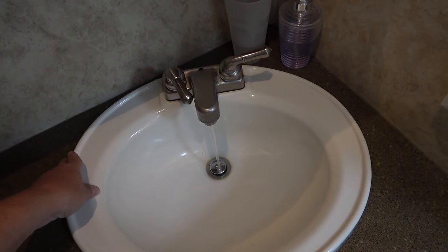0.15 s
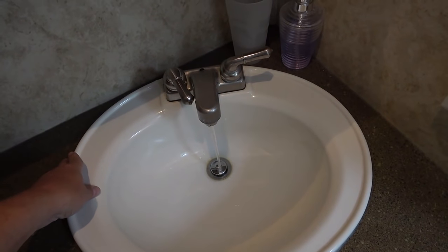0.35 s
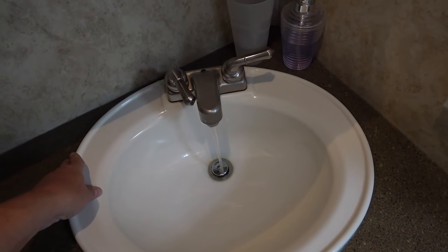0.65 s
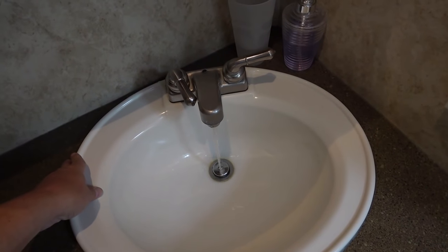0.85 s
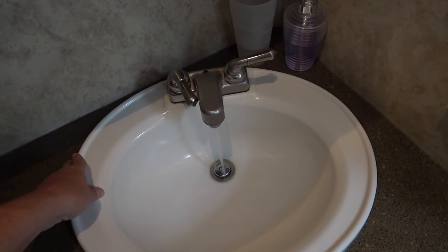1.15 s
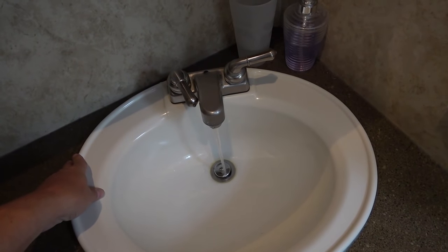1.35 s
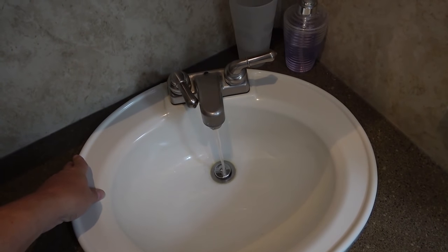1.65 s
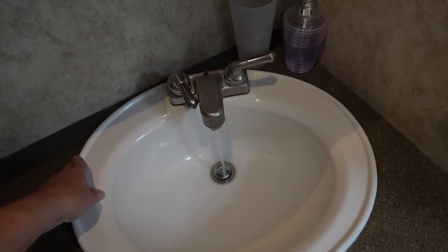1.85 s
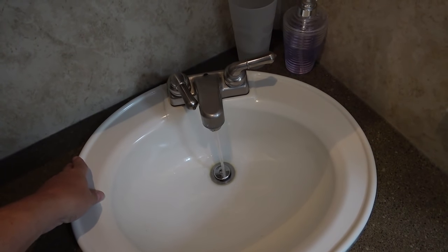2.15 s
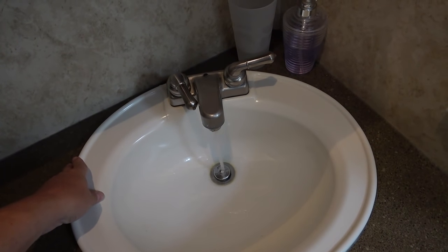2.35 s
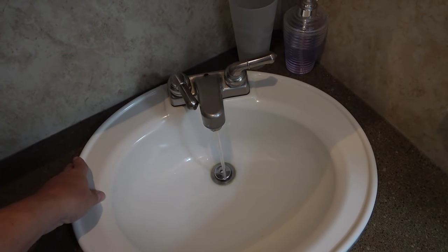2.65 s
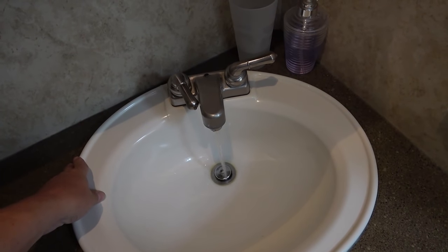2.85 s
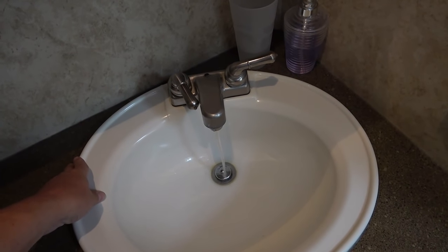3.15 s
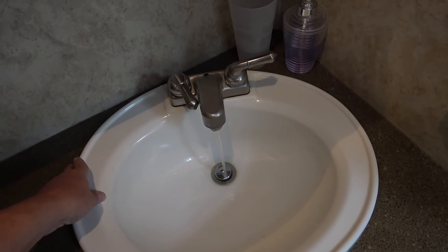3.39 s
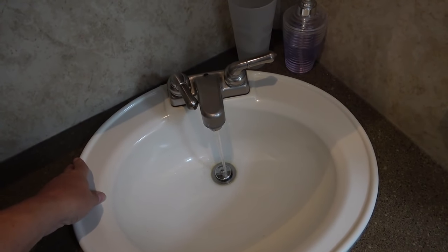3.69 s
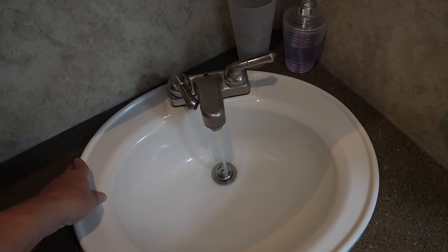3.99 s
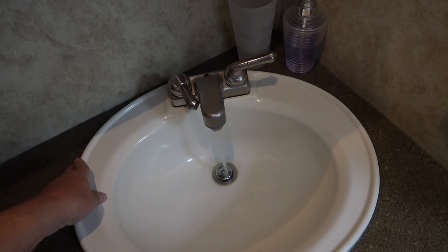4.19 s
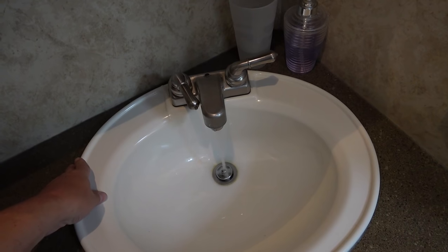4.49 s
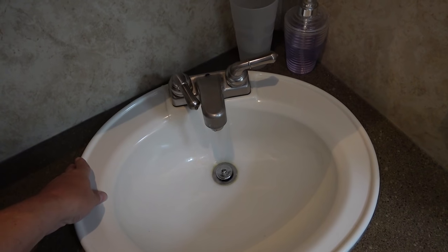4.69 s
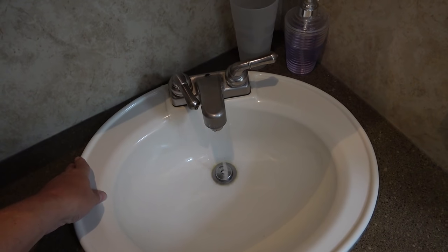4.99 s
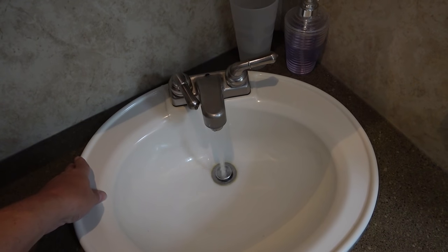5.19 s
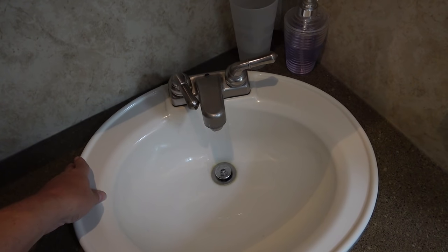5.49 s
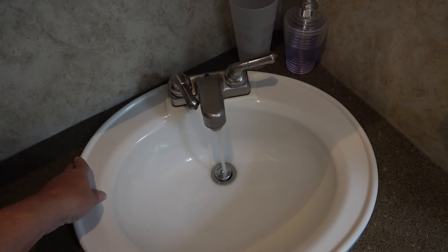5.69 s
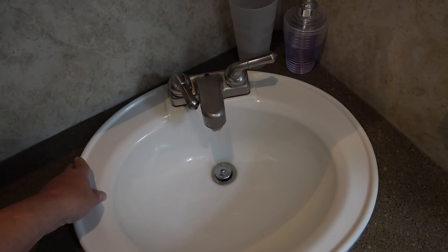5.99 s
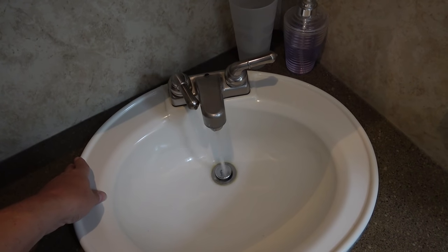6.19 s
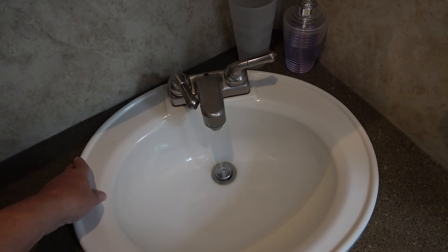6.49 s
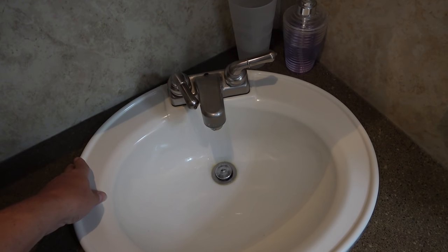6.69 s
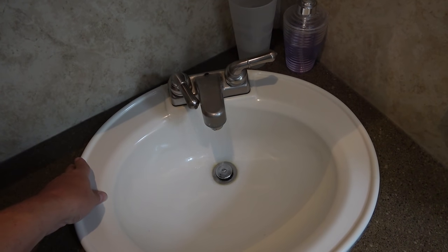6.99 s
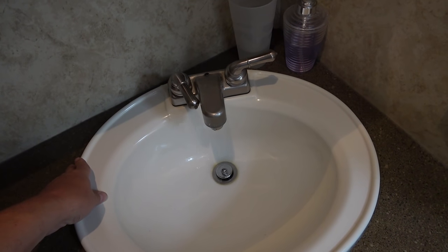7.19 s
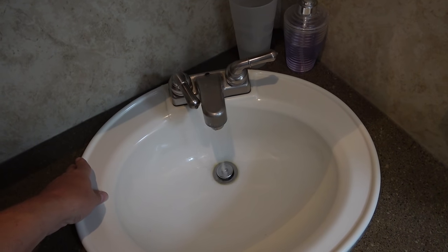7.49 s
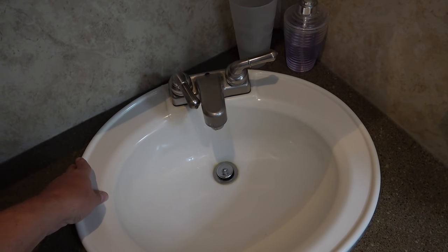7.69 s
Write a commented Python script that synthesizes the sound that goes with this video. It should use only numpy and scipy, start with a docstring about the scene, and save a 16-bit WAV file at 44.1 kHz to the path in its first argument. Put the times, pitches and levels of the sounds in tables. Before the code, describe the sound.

In a small camper bathroom, compressed air pushes water out of a tap. It first spits in quick clusters of small wet pops, with drops ticking on the basin. About halfway through it breaks into louder hollow gurgles and the drain glugs. Then air and water rush out in a hissing, slightly whistling spray, with a faint compressor hum underneath. The sound is close, with short room echoes.

```python
"""Blowing out a camper tap

Compressed air clears a bathroom tap in a small camper. Slugs of water pop and gurgle out of the spout,
trapped air sings in it, drops tick on the enamel basin and the drain glugs. Then air rushes out with
a hissing, whistling spray while the compressor motor hums. Gurgle and spray are shaped noise;
drops and pops are short, fading tones."""
import sys
import numpy as np
from scipy import signal
from scipy.fft import rfft, irfft, next_fast_len
from scipy.io import wavfile

SR = 44100
rng = np.random.default_rng(int(sys.argv[2]) if len(sys.argv) > 2 else 0)


def unload_wav(signal):
    """Save mono or channel-first audio to the path in sys.argv[1] as 16-bit WAV at rate SR, clipped to [-1, 1]."""
    wavfile.write(
        sys.argv[1],
        SR,
        np.round(np.clip(np.atleast_2d(signal).T, -1, 1) * 32767).astype(np.int16),
    )


N = 346185

# Stereo width of the room. Each row: frequency in Hz, gain in dB of the left-minus-right sound.
WIDTH_SPECTRUM = [(120, -14), (550, -8.5), (4970, -4), (15000, -3)]
# Stereo balance. Each row: time in seconds, left minus right in dB.
BALANCE = [(0, 0.5), (4.5, 0.1), (6, -1.64)]
# The compressor's hum. Each row: pitch in Hz, level in dB.
MOTOR_TONES = [(490.5, -34.5), (576, -38.5), (759, -34.5)]
# Tone colours of three noises. Each row: frequency in Hz, relative level in dB.
DRAIN_SPECTRUM = [(60, -46), (90, -9), (150, -17), (200, 2.5), (420, -3), (650, -7.5), (900, 6)]
SPRAY_SPECTRUM = [(530, -53), (1000, -24), (1800, 0.5), (2700, 1), (5160, 4), (10600, -1.5), (16000, -18.5)]
GURGLE_SPECTRUM = [(320, -57), (550, -36), (863, -4.5), (1000, -5.5), (1960, -4.5), (2560, -19.5),
                   (6000, -19)]
# The air column above the drain trap. Each row: pitch in Hz, width in Hz, gain in dB.
TRAP_RESONANCE = [(315.2, 17.3, 3)]
# Glugs in the trap. Each row: start in seconds, length in seconds, level in dB.
TRAP_GLUGS = [(.46, 0.21, -47.5), (2.66, 0.095, -51), (4.3, 0.041, -33), (5.055, 0.027, -28.5),
              (6.04, 0.33, -38.5), (6.44, 0.055, -32.5), (7.26, 0.043, -31)]
# Big bubbles swallowed by the trap. Each row: start in seconds, level in dB, pitch in Hz.
TRAP_GULPS = [(5.049, -2, 272), (5.115, -8.5, 286)]
# Foam bursting by the drain. Each row: start in seconds, end in seconds.
FOAM_TIMES = [(.03, .4)]
# Drops on the basin. Each row: start in seconds, level in dB, pitch in Hz.
BASIN_DROPS = [(0.0574, -17, 4870), (1.01, -13, 7240), (1.028, -4.5, 3400), (1.051, -11.5, 5000),
               (2.0273, -12.5, 5170), (2.546, 2.5, 3900), (3.106, -13, 8800), (3.153, -9, 9250),
               (3.179, -10, 11000), (3.3036, -11.5, 8240), (3.776, -11.5, 8500), (3.885, -16.5, 5130),
               (3.907, -15.5, 8250), (4.5113, -3.5, 3830), (4.589, -6, 4800)]
# Air pockets in the spout. Each row: start and end in seconds, first and last pitch in Hz, level in dB.
AIR_POCKETS = [(0.746, 0.764, 1970, 1310, -20), (2.776, 2.852, 2000, 1390, -20),
               (4.148, 4.192, 2100, 1890, -12), (4.18, 4.237, 1252, 1052, -17.5),
               (4.63, 4.739, 1955, 1990, -20), (5.193, 5.295, 1063, 1370, -18),
               (5.553, 5.633, 872, 882, -24.5), (5.658, 5.8, 1940, 2170, -20.5),
               (6.331, 6.448, 1966, 2080, -17.5), (7.264, 7.293, 3150, 3440, -14),
               (6.892, 6.95, 2384, 2660, -21.5), (6.653, 6.726, 1250, 1110, -25),
               (7.324, 7.554, 1370, 1363, -21), (7.625, 7.783, 1410, 1116, -19)]
# Whistles of the aerator, the mesh in the spout. Each row: pitch in Hz, relative level in dB.
WHISTLES = [(3200, -12), (3740, -17), (4010, -14), (5100, -8), (7320, -13)]
# Ringing of spout and basin. Each row: pitch in Hz, width in Hz, gain in dB.
SPOUT_RESONANCES = [(855, 60, 9), (1360, 70, 5), (1480, 40, 3), (1950, 230, 8), (3310, 90, 11),
                    (4330, 110, 11)]
# A trickle, later driven by the air. Each row: time in seconds, gurgle in dB, spray in dB.
STREAM_LEVELS = [(0, -48.5, -51), (.44, -46, -53.5), (.7, -42, -45), (1.85, -48, -49), (2.6, -46, -45),
                 (3.44, -49.5, -46.5), (4.12, -43.5, -43.5), (4.14, -33, -29), (5.0, -26, -34),
                 (5.3, -58, -21), (5.68, -12, -20), (5.9, -19, -20.5), (6.36, -17.5, -19.5),
                 (7.05, -17, -16.5), (7.255, -23, -21.5), (7.28, -18, -16.5), (7.75, -20.5, -16),
                 (7.85, -21, -20.5)]
# Water filling the spout. Each row: start in seconds, length in seconds, gurgle in dB.
WATER_SURGES = [(0.428, 0.2, -42), (1.877, 0.19, -40), (2.85, 0.2, -29), (4.163, 0.097, -16),
                (4.26, 0.22, -15), (4.595, 0.15, -19.5), (4.75, 0.081, -21.5), (5.013, 0.082, -17.5),
                (5.094, 0.54, -19)]
# Air breaking through the water. Each row: start in seconds, length in seconds, spray in dB.
AIR_BURSTS = [(4.16, 0.072, -17.5), (4.28, 0.03, -21), (4.36, 0.08, -16), (4.83, 0.12, -26),
              (5.025, 0.026, -20.5), (5.165, 0.15, -17.5), (5.7, 0.16, -18), (6.381, 0.068, -17),
              (6.45, 0.17, -15.5), (6.72, 0.06, -16), (6.805, 0.23, -17.5), (7.266, 0.021, -19)]
# Slugs of water leaving the spout. Each row: start in seconds, level in dB, seconds to fade by 60 dB.
WATER_SLUGS = [(0.72, -6, 0.06), (0.746, -7, 0.08), (0.789, -5.5, 0.095), (0.81, -7, 0.1),
               (0.832, -16, 0.08), (0.864, -6, 0.074), (0.872, -14.5, 0.27), (0.914, -17, 0.17),
               (0.953, -14.5, 0.24), (0.993, -26, 0.59), (1.085, -13, 0.07), (1.109, -21, 0.12),
               (1.15, -19, 0.056), (1.173, -9, 0.025), (1.201, -18, 0.042), (1.222, -14, 0.038),
               (1.247, -18.5, 0.035), (1.265, -13, 0.025), (1.345, -16, 0.033), (1.416, -19, 0.052),
               (1.51, -13, 0.045), (1.937, -15.5, 0.074), (2.15, -6.5, 0.12), (2.179, -11.5, 0.2),
               (2.231, -8.5, 0.088), (2.27, -7, 0.21), (2.328, -27, 0.44), (2.392, -14.5, 0.22),
               (2.43, -16, 0.11), (2.482, -27, 0.13), (2.519, -19.5, 0.45), (2.615, -16.5, 0.055),
               (2.631, -21, 0.037), (2.679, -9.5, 0.068), (2.717, -15.5, 0.082), (2.766, -9.5, 0.026),
               (2.787, -5, 0.095), (2.826, -13, 0.24), (2.917, -10, 0.15), (2.961, -10, 0.18),
               (3.093, -18, 0.27), (3.164, -19.5, 0.47), (3.247, -17, 0.026), (3.373, -14, 0.086),
               (3.394, -14, 0.043), (3.879, -21, 0.12), (4.127, -7, 0.034), (4.139, -1.5, 0.052),
               (4.699, -14, 0.069), (4.843, -2.5, 0.21), (4.897, -6, 0.12), (5.075, -7, 0.11),
               (5.12, -2, 0.18)]

TIME = np.arange(N) / SR
TICK_SAMPLES = 1000


def from_db(db):
    """Turn decibels into a gain."""
    return 10 ** (np.asarray(db) / 20)


def rms_one(x):
    """Scale a signal to an average (rms) level of 1."""
    return x / np.sqrt(np.mean(x ** 2) + 1e-20)


def in_time(rows):
    """Draw each column of a timed table as a curve."""
    times, *columns = np.transpose(rows)
    return [np.interp(TIME, times, column) for column in columns]


def at_hz(spectrum, hz):
    """Read a spectrum's dB at any frequency."""
    points_hz, points_db = np.transpose(spectrum)
    return np.interp(np.log(hz), np.log(points_hz), points_db)


def filtered(x, hz, kind="low"):
    """Keep the lows, the highs or one band."""
    return signal.sosfilt(signal.butter(2, hz, kind, fs=SR, output="sos"), x)


def lagged(x, seconds):
    """Follow a curve smoothly and a little late."""
    r = np.exp(-1 / (seconds * SR))
    return signal.lfilter([1 - r], [1, -r], x)


def drift(rate_hz):
    """A smooth random wobble, about 1 in size."""
    r = np.exp(-40 * np.pi * rate_hz / SR)
    slow = signal.lfilter([1], [1, -2 * r, r * r], rng.standard_normal(N // 20 + 2002))[2000:]
    return np.interp(np.arange(N) / 20, np.arange(len(slow)), rms_one(slow))


def swells(rows, rise_share, fall_s):
    """One gain curve per row: it swells, holds, then drops away."""
    curves = []
    for start, length, db in rows:
        rise = 1 - np.exp(-np.maximum(TIME - start, 0) / (rise_share * length))
        fall = np.exp(-np.maximum(TIME - start - length, 0) / fall_s)
        curves.append(from_db(db) * rise * fall)
    return np.array(curves)


def resonances(x, modes):
    """A hollow space rings at its own pitches, added with alternating signs."""
    out = 0
    for k, (hz, width, db) in enumerate(modes):
        r = np.exp(-np.pi * width / SR)
        feedback = [1, -2 * r * np.cos(2 * np.pi * hz / SR), r * r]
        ring = signal.lfilter([(1 - r * r) / 2, 0, (r * r - 1) / 2], feedback, x)
        out = out + (-1) ** k * from_db(db) * ring
    return out


def turbulence(spectrum, flicker_db, channels=1):
    """Churning flow: half-octave bands of noise, each flickering on its own."""
    out = 0
    edges = 40 * 2 ** np.arange(0, 9.1, .5)
    white = rng.standard_normal((2, channels, N))
    for k, (low, high) in enumerate(zip(edges, np.minimum(edges[1:], 19000))):
        if high > spectrum[0][0] and low < spectrum[-1][0]:
            band_db = at_hz(spectrum, np.sqrt(low * high)) + flicker_db * drift(22)
            out = out + filtered(white[k % 2], [low, high], "band") * from_db(band_db)
    return rms_one(out)


def rough_tone(hz, width_hz):
    """A breathy tone: narrow noise around a moving pitch."""
    phase = 2 * np.pi * np.cumsum(hz) / SR
    rough = filtered(rng.standard_normal((2, len(hz) + 4000)), width_hz)[:, 4000:]
    return rms_one(rough[0] * np.sin(phase) + rough[1] * np.cos(phase))


def add_tick(out, start_s, gain, hz, cycles, swell_cycles=1):
    """Add a bubble that swells into sound and fades by 60 dB over the given cycles."""
    turns = np.arange(TICK_SAMPLES) / SR * hz
    shape = np.minimum(turns / swell_cycles, 1) * from_db(-60 * turns / cycles)
    tick = gain * shape * np.sin(2 * np.pi * turns)
    i = int(start_s * SR)
    out[i:i + TICK_SAMPLES] += tick[:N - i]


def bathroom(centred, wide, fade_s=.09, echo_db=-14):
    """Close walls give dense, short echoes. Left and right share the mid; the side sets them apart."""
    t = np.arange(int(.3 * SR)) / SR
    echoes = rng.standard_normal((2, len(t))) * from_db(-60 * t / fade_s) * (t > .003)
    direct = centred + wide[0]
    mid, side = [signal.fftconvolve(direct, echo / np.linalg.norm(echo))[:N] for echo in echoes]
    size = next_fast_len(N)
    hz = np.maximum(np.arange(size // 2 + 1) * SR / size, 10)
    width = from_db(at_hz(WIDTH_SPECTRUM, hz))
    side = irfft(rfft(0.58 * side + wide[1], size) * width, size)[:N]
    return direct + from_db(echo_db) * mid + side * np.array([[1], [-1]])


def motor(on_s=5.26, rise_s=0.1):
    """The pipes carry the compressor's wavering tones."""
    hum = 0
    for hz, db in MOTOR_TONES:
        gain = from_db(db + 2.5 * drift(12))
        wobbly_time = TIME + np.cumsum(.007 * drift(14)) / SR
        hum = hum + gain * np.sin(2 * np.pi * hz * wobbly_time)
    return hum * np.clip((TIME - on_s) / rise_s, 0, 1)


def drain(gurgle_gain, rest_db=-54, runoff_db=-38):
    """The waste pipe gurgles low, swells after each rush of water, and glugs."""
    slosh = turbulence(DRAIN_SPECTRUM, flicker_db=3.5, channels=2)
    runoff = (lagged(gurgle_gain, seconds=0.0044) / from_db(-25)) ** 0.74
    glugs = swells(TRAP_GLUGS, rise_share=0.058, fall_s=0.012).sum(axis=0)
    gain = from_db(rest_db) + from_db(runoff_db) * runoff + glugs
    return gain * rms_one(slosh + resonances(slosh, TRAP_RESONANCE))


def bubbles(fizz_per_s=300, fizz_db=-48, fizz_hz=4920):
    """Tiny foam bubbles burst with a high fizz; big ones gulp low in the trap."""
    out = np.zeros(N)
    for start, end in FOAM_TIMES:
        for when, pitch, size in rng.random((int(fizz_per_s * (end - start)), 3)):
            hz = fizz_hz * 2 ** (.25 * (pitch - .5))
            add_tick(out, start + when * (end - start), from_db(fizz_db + 4.4 * size ** 2), hz, cycles=110)
    for start, db, hz in TRAP_GULPS:
        add_tick(out, start, from_db(db), hz, cycles=8.8)
    return out


def drops(spray_gain, small_count=1600):
    """Big drops tick on the enamel; small random ones grow louder with the spray, up to a limit."""
    out = np.zeros(N)
    for start, db, hz in BASIN_DROPS:
        add_tick(out, start, from_db(db), hz, cycles=28)
        add_tick(out, start, from_db(db - 7), 1.9 * hz, cycles=35)
    strength = np.minimum(spray_gain, from_db(-34))
    for when, pitch, size, ring in rng.random((small_count, 4)):
        gain = strength[int(when * N)] * from_db(2 + 16 * size ** 2)
        add_tick(out, when * N / SR, gain, hz=3500 * 2 ** (1.7 * pitch), cycles=14 + 60 * ring ** 2)
    return out


def air_pockets(width_hz=70, flutter_db=3.5):
    """A pocket's tone slides as it shrinks or grows, and flutters as water crosses it."""
    out = np.zeros(N)
    for start, end, first_hz, last_hz, db in AIR_POCKETS:
        i, size = int(start * SR), int((end - start) * SR)
        tone = rough_tone(np.linspace(first_hz, last_hz, size), width_hz)
        out[i:i + size] += from_db(db) * tone * signal.windows.tukey(size, .5)
    flutter = from_db(flutter_db * np.clip(drift(35), -3, 1.5))
    return out * rms_one(flutter)


def pops():
    """The film of water across the spout breaks as each slug leaves: a short double ring."""
    out = np.zeros(N)
    for start, db, fade_s in WATER_SLUGS:
        low, high = rng.random(2)
        gain = from_db(db) * min(0.15 / fade_s, 1)   # short slugs pop hardest
        add_tick(out, start, gain, hz=1950 * 2 ** (.15 * (low - .5)), cycles=36, swell_cycles=4)
        add_tick(out, start, gain * from_db(-8), hz=3300 * 2 ** (.4 * high), cycles=50)
    return out


def slug_gains():
    """Each slug bursts out, holds a moment and drains away; its spray dies twice as fast as its gurgle."""
    out = np.zeros((2, N))
    t = np.arange(int(SR * .3)) / SR
    for start, db, fade_s in WATER_SLUGS:
        rise = 1 - np.exp(-t / (0.014 * fade_s))   # long slugs start more gently
        shape = rise * from_db(-11 - 60 * (t / max(fade_s, .03)) ** 1.378)
        spit_db = -10 - 0.24 * (db + 14)   # big slugs stay whole and spit less
        i = int(start * SR)
        out[0, i:i + len(t)] += from_db(db) * shape
        out[1, i:i + len(t)] += from_db(spit_db) * shape ** 2
    return out


def flow(steady_from_s=5.3):
    """Stream, surges, air and slugs set the gurgle and spray gains, and how wet the spout is (0 to 1)."""
    tearing = np.where(TIME < steady_from_s, 1, 0.25)   # water tears into lumps, less once the jet holds
    lumps = from_db(tearing * np.clip([3.33 * drift(62), 2.8 * drift(78)], -8, 4.5))
    water, mist = from_db(in_time(STREAM_LEVELS))
    surges = swells(WATER_SURGES, rise_share=0.073, fall_s=0.0048)
    splash_db = [-42 + 0.41 * (db + 30) - db for _, _, db in WATER_SURGES]   # relative to each surge
    splash = from_db(splash_db) @ surges
    air = swells(AIR_BURSTS, rise_share=0.09, fall_s=0.01).sum(axis=0)
    wet = from_db(-13 * lagged(air, seconds=0.04) / from_db(-14))   # blowing air dries the spout
    gurgle_gain = np.hypot(water, surges.sum(axis=0)) * wet
    spray_gain = np.sqrt(mist ** 2 + air ** 2 + splash ** 2)
    return np.hypot([gurgle_gain, spray_gain], slug_gains()) * lumps, wet


def gurgle(gain, ring_db=13, level_db=-2):
    """Air and water churn in the spout and set it ringing with a hollow sound."""
    churn = turbulence(GURGLE_SPECTRUM, flicker_db=2.5)[0]
    steady_level = np.std(churn + from_db(ring_db) * resonances(churn, SPOUT_RESONANCES))
    ringing = from_db(ring_db) * resonances(gain * churn, SPOUT_RESONANCES)
    return from_db(level_db) * (gain * churn + ringing) / steady_level


def spray(gain, wet, thin_below_hz=2400):
    """Air hisses through the aerator and scatters over the basin; whistles grow as the spout dries."""
    hiss = turbulence(SPRAY_SPECTRUM, flicker_db=2, channels=2)
    for hz, db in WHISTLES:
        pitch = hz * (1 + .012 * drift(1.5))
        strength = from_db(db + 3 * drift(4)) * (1.35 - wet)
        hiss = hiss + strength * np.array([rough_tone(pitch, width_hz=75) for _ in range(2)])
    hiss = rms_one(hiss)
    body = filtered(hiss, thin_below_hz) * wet ** .75   # a dry spout sounds thinner
    hiss = filtered(hiss, thin_below_hz, "high") - body
    dull = filtered(hiss, 7000)
    brightness = np.clip(gain / from_db(-9.5), .3, 1.2) ** 0.25   # louder spray is brighter
    return gain * (dull + brightness * (hiss - dull))


def scene():
    """Tap, drops, drain and motor sound together in the little room."""
    (gurgle_gain, spray_gain), wet = flow()
    tap = pops() + gurgle(gurgle_gain) + air_pockets()
    centred = tap + drops(spray_gain) + bubbles() + motor()
    wide = spray(spray_gain, wet) + drain(gurgle_gain)
    left_db = in_time(BALANCE)[0] / 2
    return bathroom(centred, wide) * from_db([left_db, -left_db])


def record(dry, bass_hz=70, top_hz=16300):
    """Deep bass is removed, peaks are rounded and the highest treble is cut."""
    rounded = np.tanh(filtered(dry, bass_hz, "high"))
    return signal.sosfilt(signal.cheby2(12, 70, top_hz, fs=SR, output="sos"), rounded)


dry = scene()
out = record(dry)
unload_wav(out)
```